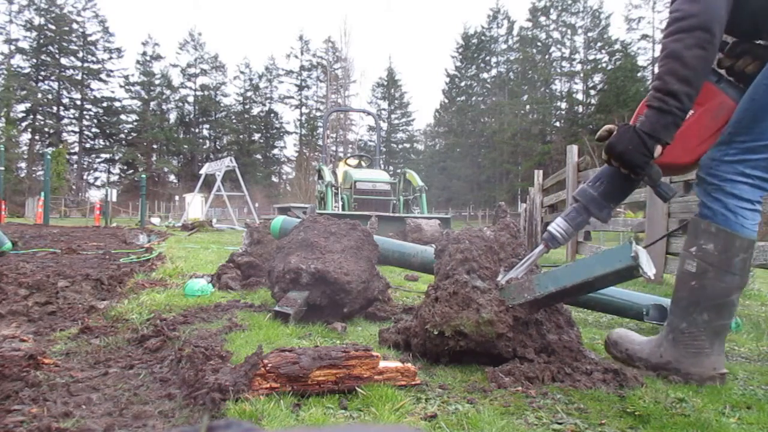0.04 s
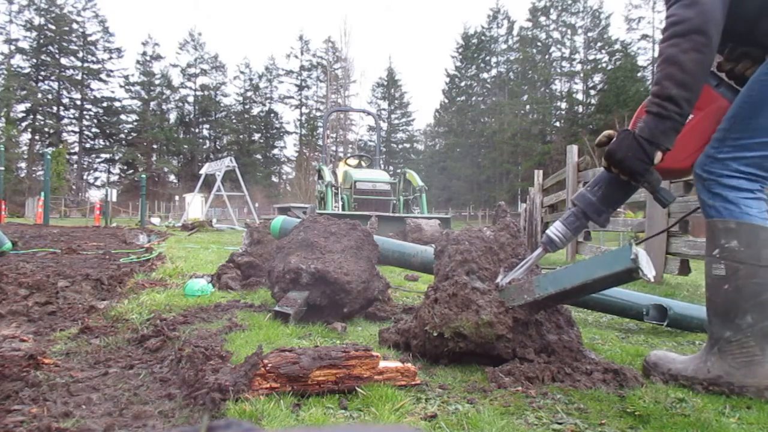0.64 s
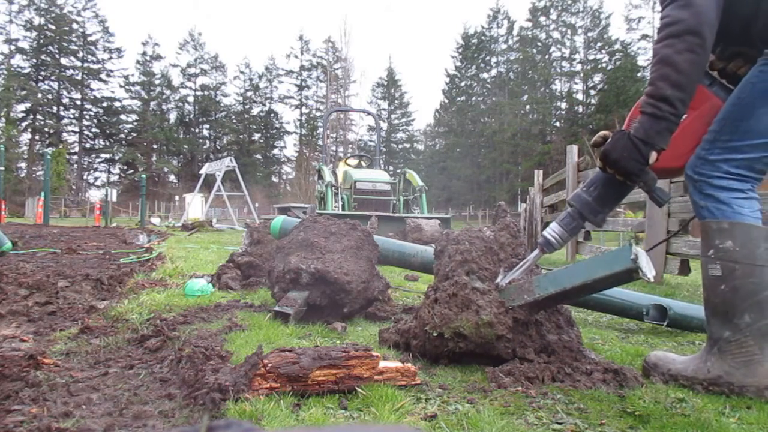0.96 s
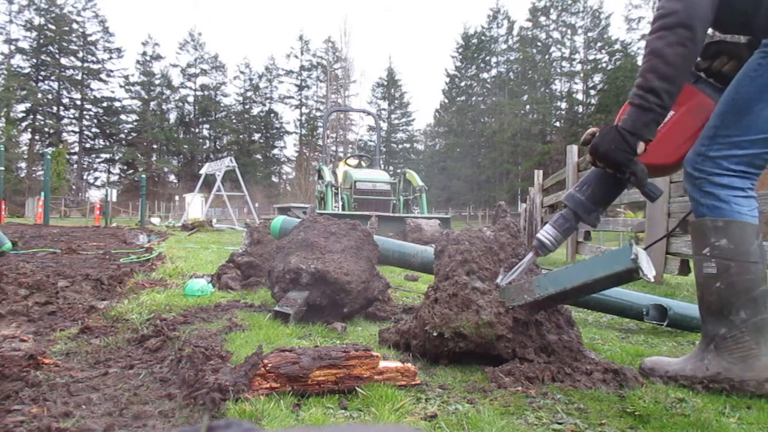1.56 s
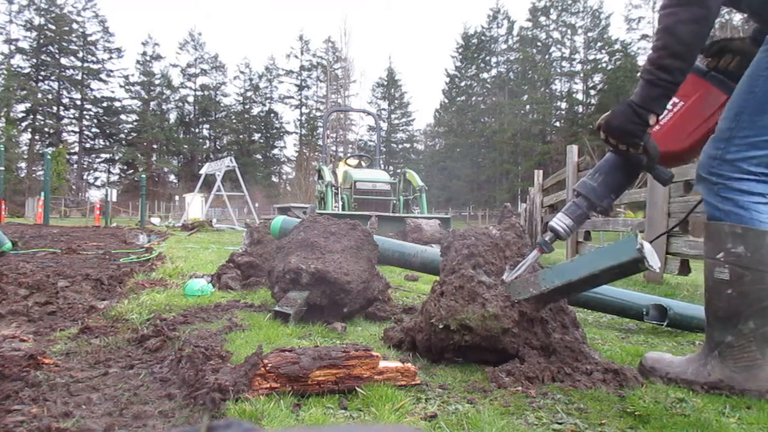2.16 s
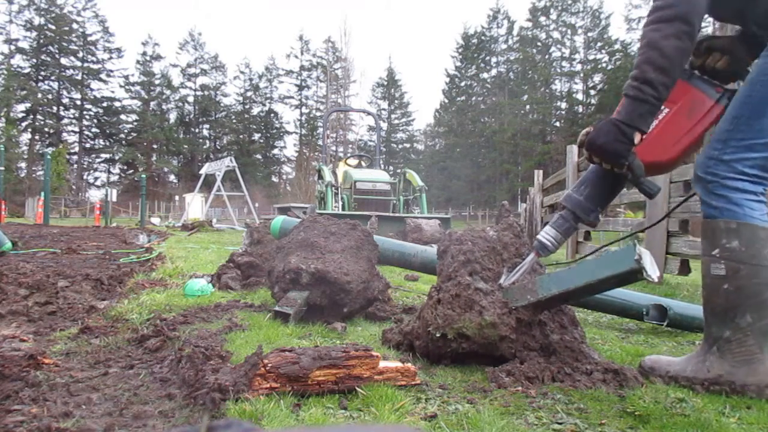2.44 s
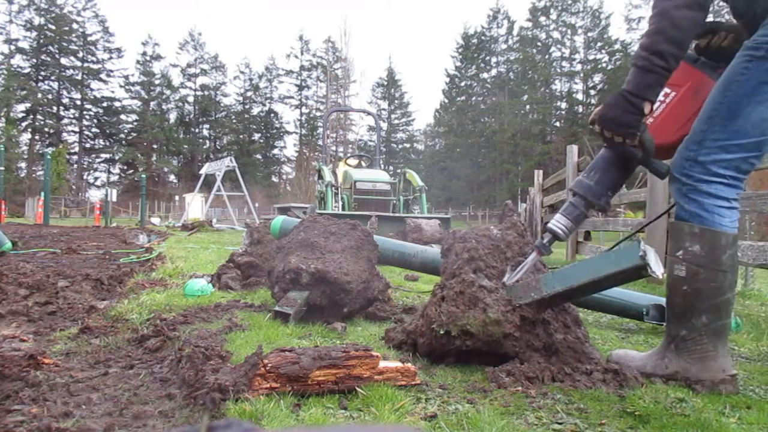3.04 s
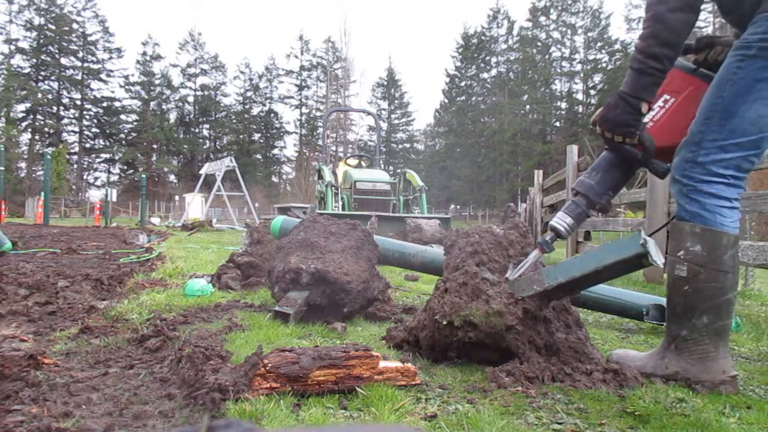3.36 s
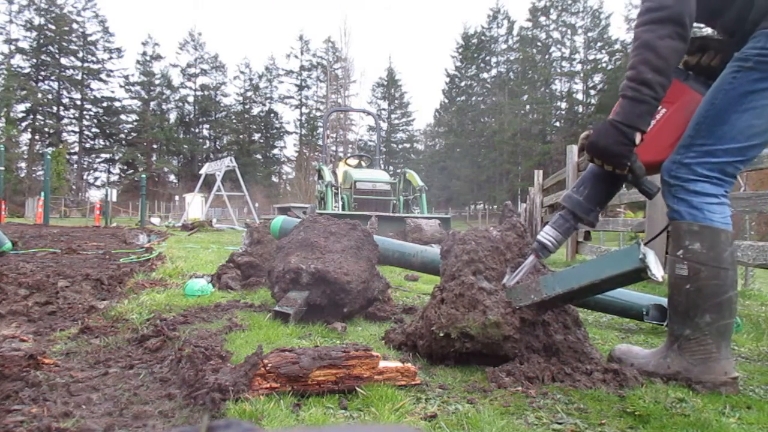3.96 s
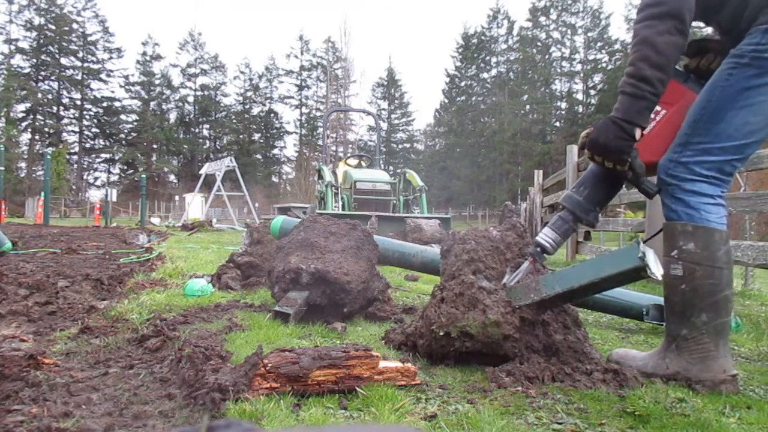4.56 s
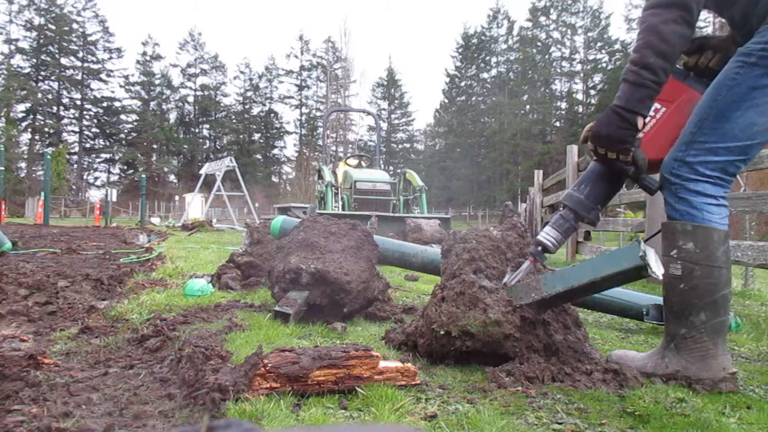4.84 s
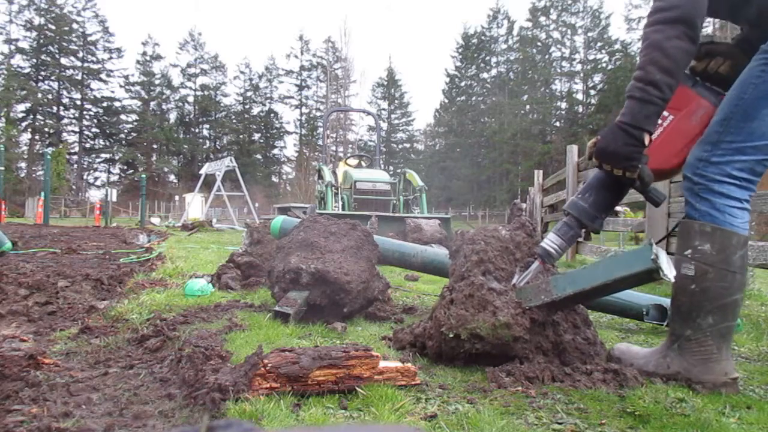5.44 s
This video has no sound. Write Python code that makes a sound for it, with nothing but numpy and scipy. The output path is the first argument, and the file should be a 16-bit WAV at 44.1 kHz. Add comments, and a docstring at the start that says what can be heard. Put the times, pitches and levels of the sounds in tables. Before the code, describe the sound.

Three bursts of hard, ringing steel hammering from an electric demolition hammer outdoors, separated by a quieter whirring idle.

```python
"""A hard steel clatter, about 32 blows a second: an electric demolition hammer digs into a muddy clod.
On each blow the striker clacks, the chisel rings and kicks back, the housing booms and the soil thuds;
trees answer faintly. After each of three bursts the motor overshoots and settles toward a whining
idle with fan noise. Crumbs of earth fall, wet mud pops, and near the end a boot shifts on the turf."""
import sys
import numpy as np
from scipy import signal
from scipy.fft import rfft, irfft, next_fast_len
from scipy.io import wavfile
from scipy.ndimage import uniform_filter1d, minimum_filter1d, map_coordinates

SR = 44100
rng = np.random.default_rng(int(sys.argv[2]) if len(sys.argv) > 2 else 0)


def to_wav(sig):
    """Store sig (one row per channel, or 1-D mono) as 16-bit WAV at the path in sys.argv[1].

    Samples outside -1..1 are clipped; the rate is SR.
    """
    pcm = np.clip(np.atleast_2d(sig), -1, 1) * 32767
    pcm = np.round(pcm).astype(np.int16)
    wavfile.write(sys.argv[1], SR, pcm.T)  # frames by channels


N = 242550
TIME = np.arange(N) / SR
AGE = np.arange(SR // 8) / SR  # seconds since a blow


def amp(db):
    """Decibels to gain."""
    return 10 ** (np.asarray(db) / 20)


def unit(x):
    """Scale to rms 1."""
    return x / np.sqrt(np.mean(x ** 2) + 1e-20)


def fade(t, t60):
    """Exponential decay, 60 dB down after t60 seconds."""
    return np.exp(-np.log(1000) * t / t60)


def attack(t, rise_s):
    """Exponential rise from 0 toward 1."""
    return 1 - np.exp(-t / rise_s)


def bell(t, width_s):
    """Bell-shaped envelope, peaking at t = 0."""
    return np.exp(-(t / width_s) ** 2)


def automation(rows, when):
    """Each lane of a (time, values...) table at the given times."""
    times, *lanes = np.transpose(rows)
    return [np.interp(when, times, lane) for lane in lanes]


def wobble(rate):
    """A smooth random curve, rate knots a second."""
    return map_coordinates(rng.standard_normal(int(N * rate / SR) + 4), [TIME * rate])


def filtered(x, response):
    """Shape x with a frequency response."""
    n = x.shape[-1]
    padded = next_fast_len(n + 8192)
    return irfft(rfft(x, padded) * response(np.fft.rfftfreq(padded, 1 / SR)), padded)[..., :n]


def noise(spectrum, shape):
    """Noise of rms 1, coloured by (frequency [Hz], level [dB]) points."""
    points_hz, db = np.transpose(spectrum)
    colour = lambda hz: amp(np.interp(np.log(hz + 1), np.log(points_hz), db))
    return unit(filtered(rng.standard_normal(shape), colour))


def blow_noise(spectrum, count, alike):
    """One noise per blow; the share alike is the same every time, since the same parts collide."""
    rows = noise(spectrum, (count + 1, len(AGE)))
    return np.sqrt(alike) * rows[0] + np.sqrt(1 - alike) * rows[1:]


def place(times, db, sounds):
    """Mix one sound per event at its time and level."""
    index = np.round(np.maximum(times, 0) * SR).astype(int)[:, None] + np.arange(sounds.shape[-1])
    return np.bincount(index.ravel(), (amp(db)[:, None] * sounds).ravel(), N)[:N]


# Even hammering, slower when the tool is leaned on: (first blow [s], rate [blows/s], blows [count])
RUNS = [(0.0011, 32.01, 11), (0.3447, 32.4, 6), (0.5299, 32.636, 37), (1.6636, 30.96, 3),
        (2.4557, 32.03, 4), (2.5806, 29.37, 5), (3.6699, 31.6, 8), (3.9231, 29.56, 4), (4.0584, 31.32, 12),
        (4.4415, 30.58, 3)]
# The mix as the chisel sinks in and clack gives way to ring and thud, one table per burst:
# (time [s], clack [dB], chisel ring [dB], housing boom [dB], soil thud [dB])
DIGGING = [
    [(0, -13, -13.5, -22.5, -33), (.3, -14.5, -14, -26, -34.5), (.6, -12.5, -13.5, -25, -34),
     (.85, -12, -11, -27, -34.5), (1.1, -12, -11.5, -26, -36.5), (1.5, -16, -10.5, -25.5, -31),
     (1.73, -19, -10, -26.5, -31.5)],
    [(2.456, -11.5, -11, -30.5, -31.5), (2.62, -12, -9.5, -28, -33.5), (2.72, -13, -9.5, -31, -27.5)],
    [(3.67, -11, -23, -56, -47), (3.71, -9.5, -15.5, -38, -38.5), (3.88, -10, -8.5, -31.5, -31.5),
     (4.22, -16.5, -7.5, -30.5, -29), (4.32, -22.5, -15.5, -31.5, -36), (4.4, -13, -18, -26.5, -32),
     (4.51, -12.5, -17.5, -39, -39)],
]
# Taps as the chisel is set down or lifted: (time [s], clack [dB], chisel ring [dB], housing boom [dB])
TAPS = [(1.7612, -28.5, -26, -35.5), (2.3887, -29.5, -41, -57), (2.394, -23.5, -37, -57),
        (2.4209, -13.5, -23, -46), (2.7525, -25.5, -33, -31), (2.7848, -34, -36, -42),
        (3.577, -26, -39, -52), (3.584, -18.5, -57, -38), (3.607, -12, -27, -37), (3.631, -43, -49, -57),
        (4.5355, -20, -31.5, -55), (4.5667, -24.5, -35, -43), (4.6461, -26, -62, -62),
        (4.6994, -28.5, -51, -61), (4.734, -36, -63, -57), (5.3988, -27, -44, -60),
        (5.4104, -21.5, -37, -59), (5.4387, -12, -24, -37.5), (5.469, -16.5, -27.5, -54)]


def strikes():
    """Cue every blow and stray tap: times, then clack, ring, boom and thud levels."""
    jitter_s, tap_thud_db = .00008, -12  # a tap's thud is set relative to its boom
    times = np.concatenate([start + np.arange(count) / rate for start, rate, count in RUNS])
    jittered = times + jitter_s * rng.standard_normal(len(times))
    steady = np.column_stack([jittered, *automation(np.vstack(DIGGING), times)])
    stray = [(when, db, ring_db, boom_db, boom_db + tap_thud_db) for when, db, ring_db, boom_db in TAPS]
    return np.vstack([steady, stray]).T


# The bright edge of a blow: (frequency [Hz], level [dB])
BRIGHT_EDGE = [(2500, -25), (5500, -1.5), (8500, -2.5), (10000, -5), (12000, -9), (15500, -16)]


def contact(times, db):
    """Steel meets steel: a hard snap about a millisecond long, at a slightly new pitch each time."""
    hz = 3150 * np.exp(0.082 * rng.standard_normal((len(times), 1)))
    snap = np.sin(2 * np.pi * hz * AGE) * bell(AGE, 0.0013)
    tick = noise(BRIGHT_EDGE, (len(times), len(AGE))) * fade(AGE, 0.0054)
    accent_db = np.clip(2 * (db + 12), -6, 5)  # hard blows snap out of proportion
    return place(times, db + accent_db, amp(3) * snap) + place(times, db, amp(-3) * tick)


def ringing(table, count, scatter_db, phase_spread, detune):
    """Struck metal: decaying modes, rebalanced and slightly retuned for each blow."""
    hz, db, t60 = np.transpose(table)
    cycles = hz[:, None] * AGE + phase_spread * rng.random((len(hz), 1))
    modes = np.sin(2 * np.pi * cycles) * fade(AGE, t60[:, None])
    blows = amp(db + scatter_db * rng.standard_normal((count, len(hz)))) @ modes
    speeds = np.exp(detune * rng.standard_normal(count))
    return np.array([map_coordinates(blow, [AGE * SR * speed]) for blow, speed in zip(blows, speeds)])


# The ring of barrel and tool holder: (frequency [Hz], level [dB], t60 [s])
BARREL_MODES = [(1978, -14.5, 0.072), (2605, -4.5, 0.042), (2766, -2, 0.037), (2843, -1.5, 0.019),
                (3042, -4, 0.05), (3420, -28, 0.016), (3662, -5.5, 0.066), (4012, -1.5, 0.038),
                (5156, -3, 0.035), (5650, -10.5, 0.064), (6610, -4.5, 0.053), (7555, 0, 0.023),
                (8860, -9, 0.056), (9330, -8, 0.04), (10640, -8.5, 0.027)]
# The clank of a chisel loose in its holder: (frequency [Hz], level [dB], t60 [s])
LOOSE_MODES = [(3003, 8.5, 0.015), (3240, -2.5, 0.024), (3635, -8.5, 0.052), (3687, 0, 0.033),
               (3986, -5.5, 0.036), (4850, -13.5, 0.062)]
# The dense rattle of the mechanism: (frequency [Hz], level [dB])
RATTLE = [(300, -65), (1200, 3), (1800, 6), (2900, -1), (3900, 2), (4500, 3), (5250, 8), (6100, -6.5),
          (8200, -23), (10000, -56.5), (15500, -108)]


def clack(times, db, ring_db):
    """The striker hits steel: a crack and ringing modes, plus a clank when the chisel is unseated."""
    count = len(times)
    loose = np.clip((db - ring_db - 3.5) / 12, 0, 1)[:, None]  # much clack, little ring: unseated
    ring = amp(-4.5) * ringing(BARREL_MODES, count, scatter_db=2.5, phase_spread=0.97, detune=0.0048)
    clank = amp(1.5) * ringing(LOOSE_MODES, count, scatter_db=4.5, phase_spread=0, detune=0.0097)
    crack = amp(-2.5) * blow_noise(RATTLE, count, alike=0.66) * fade(AGE, 0.031)
    body = (1 - 0.15 * loose) * (ring + crack) + loose * clank
    edge = blow_noise(BRIGHT_EDGE, count, alike=0.66) * (fade(AGE, 0.033) + amp(-14) * fade(AGE, 0.16))
    edge_db = db + 0.33 * (ring_db - db) - 7
    onset = attack(AGE, .0001)
    return place(times, db, body * onset) + place(times, edge_db, edge * onset)


# The chisel's ring shifts as it sinks in: (time [s], pitch [Hz], upper partner [dB], overtone [dB])
CHISEL_TUNING = [(0, 7890, 1, -15), (.75, 8015, -10.5, -11), (1.1, 8000, 13, -19), (1.7, 8150, -11, -22),
                 (2.6, 7930, -1, -20), (3.8, 8060, 3, -22), (4.15, 7930, -50, -17), (4.3, 8120, -16, -3),
                 (4.5, 7930, 5, -12)]
# The rasp of the choked chisel: (frequency [Hz], level [dB])
JINGLE = [(6800, -30), (7600, 0), (8100, 12), (8600, -1.5), (9000, -38), (9900, -16.5)]


def chisel(times, db):
    """Lengthwise waves in the chisel: a beating pair, soon choked to a jingle, and a high overtone."""
    hz, partner_db, overtone_db = automation(CHISEL_TUNING, times)
    drift = rng.standard_normal((len(times), 3))
    tone = lambda pitch: np.sin(2 * np.pi * pitch[:, None] * AGE)
    partner_gain = amp(partner_db)[:, None]
    pair = tone(hz + 50 * drift[:, 0]) + partner_gain * tone(hz + 335 + 55 * drift[:, 1])
    choke = np.exp(-(AGE / 0.0043) ** 4) + amp(-20) * fade(AGE, 0.033)
    ring = pair / np.hypot(1, partner_gain) * choke
    overtone = amp(overtone_db - 1)[:, None] * tone(15670 + 35 * drift[:, 2]) * fade(AGE, .035)
    jingle = amp(-7.5) * blow_noise(JINGLE, len(times), alike=0.18) * fade(AGE, 0.073)
    return amp(2.5) * place(times, db, (ring + overtone + jingle) * attack(AGE, .0003))


def housing(times, db):
    """Recoil sets housing and barrel ringing: a low boom under a short clang."""
    t = TIME[:SR // 3]
    mode = lambda hz, t60: np.sin(2 * np.pi * hz * t) * fade(t, t60) * attack(t, 0.0042)
    scatter_db = np.where(times < .6, 4, 1.3)  # unsteady until the chisel has bitten in
    boom_db = db + scatter_db * rng.standard_normal(len(times))
    boom = amp(4) * mode(hz=297.8, t60=0.22) + amp(-28) * mode(hz=98, t60=0.1)
    clang = amp(10) * mode(hz=1528.5, t60=0.057)
    return place(times, boom_db, boom) + place(times, db, clang)


# The dull crunch of crushed soil: (frequency [Hz], level [dB])
SOIL = [(20, -10), (45, -2.5), (90, 5.5), (190, 5.5), (450, 5), (900, -2), (1300, -3), (3000, -43)]


def soil(times, db):
    """Each blow crushes a little soil; its knock dives in pitch as the clod yields."""
    falling_hz = 100 + 1250 * np.exp(-AGE / 0.002946)
    knock = np.sin(2 * np.pi * np.cumsum(falling_hz) / SR) * fade(AGE, 0.026) * attack(AGE, 0.00016)
    envelope = bell(AGE - .002, 0.0032) + amp(-11.5) * fade(AGE, 0.11)
    crush = blow_noise(SOIL, len(times), alike=0.26) * envelope
    return place(times, db, amp(12.5) * knock + amp(7) * crush)


# The scrape of the chisel kicking back: (frequency [Hz], level [dB])
SCRAPE = [(800, -27), (1800, -4.5), (2800, 3.5), (3600, -1), (5200, -8.5), (9000, -7.5), (15000, -55)]


def rebounds(times, ring_db, boom_db):
    """The chisel kicks back into its holder twice after each blow: short, slightly rising chinks."""
    kick_db = (boom_db + ring_db) / 2 - 1.5  # a well seated chisel under weight kicks hardest
    scrape_envelope = fade(AGE, .017) * attack(AGE, .0003)
    kicks = np.zeros(N)
    for delay_s, scatter_s, db in [(.008, .0015, 2.2), (.0178, .002, 3.3)]:
        late, size, pitch = rng.uniform(-1.5, 1.5, (3, len(times)))
        hz = 2650 * np.exp(.07 * pitch)[:, None]
        chink = np.sin(2 * np.pi * hz * (AGE + 45 * AGE ** 2)) * bell(AGE - .001, 0.00064)
        scrape = amp(2) * noise(SCRAPE, (len(times), len(AGE))) * scrape_envelope
        kicks += place(times + delay_s + scatter_s * late, kick_db + db + 2 * size, chink + scrape)
    return kicks


def trees(source):
    """A thin echo, scattered back from fence and trees."""
    t = TIME[:SR // 2]
    envelope = fade(t, .3) * attack(t, .01)
    tail = noise([(100, 12), (1000, -1.5), (8000, -6.5), (15000, -15)], len(t)) * envelope
    return signal.fftconvolve(source, tail / np.linalg.norm(tail))[:N]


# The motor runs free after each burst: (let go [s], loaded again [s], overshoot [turns/s])
PAUSES = [(1.733, 2.42, 45), (2.757, 3.67, 25.2), (4.4966, 5.5, 35)]


def shaft():
    """Speed and time spent idling: let go, the motor races past idle and settles; load drags it down."""
    loaded_speed, idle_speed = 285.0, 307.3  # turns/s
    spin_up_s, settle_s, drag_s = .0514, .32, .08
    speed, idling_s = np.full(N, loaded_speed), np.zeros(N)
    for let_go, loaded, overshoot in PAUSES:
        since = np.maximum(TIME - let_go, 0)
        free = attack(since, spin_up_s) * np.exp(-np.maximum(TIME - loaded, 0) / drag_s)
        speed += free * (idle_speed - loaded_speed + overshoot * bell(since, settle_s))
        idling_s += free * since
    return speed, idling_s


# The broad rush of the fan: (frequency [Hz], level [dB])
FAN = [(25, -22), (120, -8), (260, -10.5), (550, -13), (1100, -0.5), (2200, -9), (3000, -7), (4300, -14.5),
       (5400, -12), (7500, -20.5), (9400, -21), (15500, -43)]
# The hollow resonances of the air vents: (frequency [Hz], width [Hz], level [dB])
VENTS = [(237.6, 9.8, 1.5), (311.8, 13.4, 2), (1196, 120, -12), (1443, 15, 4), (1860, 36, 1.5)]


def cooling_air():
    """The fan's rush, and air sounding the vents: band-passed noise in alternating polarity."""
    vents = lambda hz: sum((-1) ** k * amp(db) * 1j * hz * width / (mid ** 2 - hz ** 2 + 1j * hz * width)
                           for k, (mid, width, db) in enumerate(VENTS))
    return amp(1.5) * noise(FAN, N) + amp(-1.5) * unit(filtered(rng.standard_normal(N), vents))


# Fan and commutator whine: (pitch [multiple of shaft speed], idle level [dB], racing level [dB])
WHINE = [(1, -9, -13), (4, -1, 0), (8, 3, -10), (9, 2.3, 2.3), (18, -10, -1), (27, -23, -12),
         (36, -24, -17)]


def motor():
    """Fluttering tones locked to the shaft, over cooling air."""
    base_db, recovery_db_per_s = -44.5, 2.5
    speed, idling_s = shaft()
    turns = np.cumsum(speed * (1 + 0.00019 * wobble(60))) / SR
    racing = np.clip((speed - 307) / 33, 0, 1)
    whine = np.zeros(N)
    for multiple, idle_db, racing_db in WHINE:
        db = idle_db + (racing_db - idle_db) * racing + 1.3 * wobble(12) + 2.26 * wobble(110)
        whine += amp(db) * np.sin(2 * np.pi * multiple * turns)
    pumping = 1 + 0.069 * np.sin(2 * np.pi * turns / 9)  # the piston pumps the air once in nine turns
    # as with a recorder's automatic gain, whine and air duck during hammering and recover in each pause
    duck = np.clip((305 - speed) / 12, 0, 1)
    return amp(base_db + recovery_db_per_s * idling_s - 1.7 * duck) * (whine + cooling_air() * pumping)


# Falling crumbs of earth: (time [s], level [dB])
CRUMBS = [(3.0435, -25), (3.1921, -31), (3.252, -27), (5.0854, -27)]


def crumbs():
    """Crumbs of earth land with tiny ticks, in the same noise colour as the rattle."""
    times, db = np.transpose(CRUMBS)
    ticks = noise(RATTLE, (len(times), len(AGE))) * fade(AGE, 0.026)
    return place(times, db - 10, ticks)


# Wet mud squeezed by a blow: (time [s], pitch [Hz], level [dB])
SQUELCHES = [(4.2535, 920, -17), (4.285, 690, -14.5), (4.318, 706, -17.5), (4.348, 650, -27)]


def mud():
    """Air pockets in the wet soil pop with a short rising note."""
    times, hz, db = np.transpose(SQUELCHES)
    lead_s = .004
    t = AGE - lead_s
    pops = np.sin(2 * np.pi * hz[:, None] * (t + 25 * t ** 2)) * bell(t, .0026)
    return place(times - lead_s, db, pops)


def boot():
    """A boot shifts on the turf: one soft, low scuff."""
    turf = noise([(25, 1), (90, -3), (220, -1), (500, -12), (3000, -36)], N)
    return amp(-35.5) * turf * bell(TIME - 4.945, 0.011)


def scene():
    """The hammer and its echo up front; motor, crumbs and boot underneath. Mono."""
    times, clack_db, ring_db, boom_db, thud_db = strikes()
    steel = contact(times, clack_db) + clack(times, clack_db, ring_db)
    steel += chisel(times, ring_db) + rebounds(times, ring_db, boom_db)
    hammer = steel + housing(times, boom_db) + soil(times, thud_db) + mud()
    return (hammer + amp(-18.5) * trees(hammer) + motor() + crumbs() + boot())[None]


def record(dry):
    """The microphone sheds deep bass, a fast limiter flattens the blows, and the very top is cut."""
    low_cut_hz, ceiling, top_hz = 60, .72, 16000
    heard = filtered(dry, lambda hz: 1j * hz / (1j * hz + low_cut_hz))
    needed_gain = np.minimum(1, ceiling / (np.abs(heard) + 1e-9))
    smooth_gain = uniform_filter1d(minimum_filter1d(needed_gain, size=41), size=21)
    return filtered(heard * smooth_gain, lambda hz: hz < top_hz)


dry = scene()
out = record(dry)
to_wav(out)
```